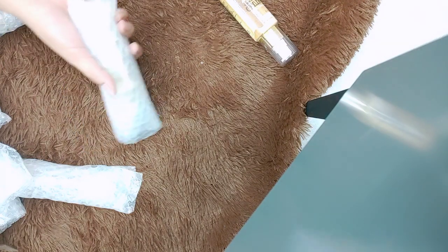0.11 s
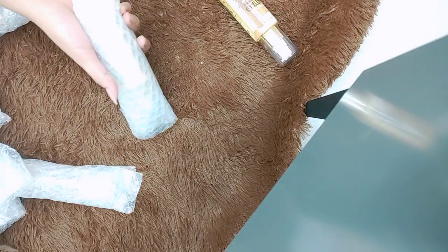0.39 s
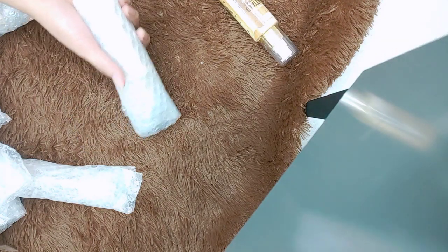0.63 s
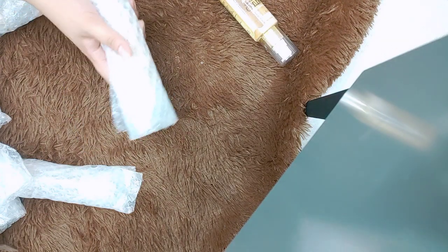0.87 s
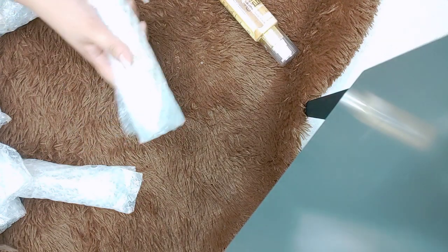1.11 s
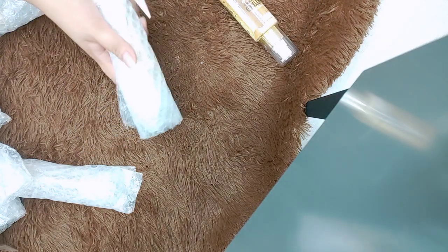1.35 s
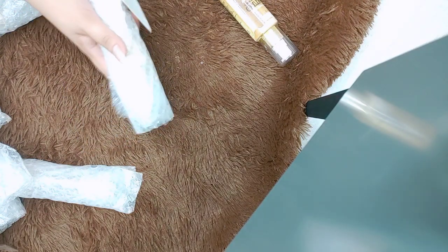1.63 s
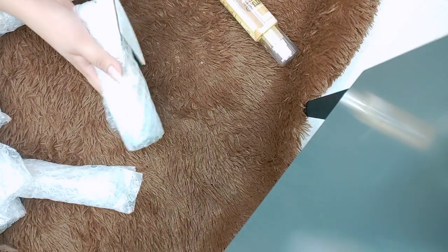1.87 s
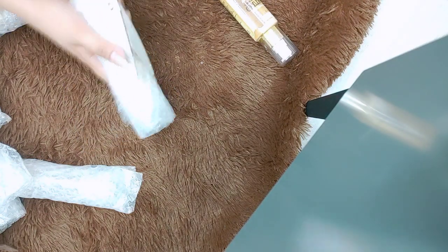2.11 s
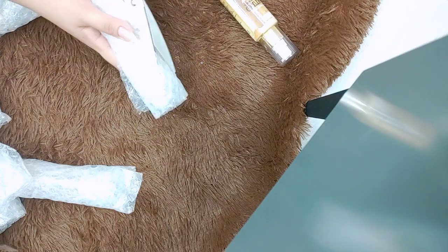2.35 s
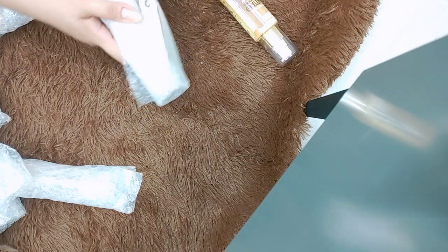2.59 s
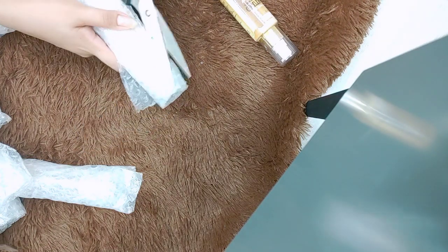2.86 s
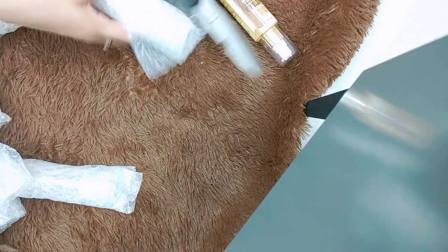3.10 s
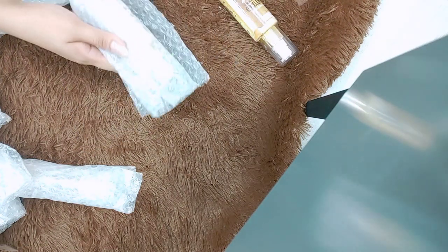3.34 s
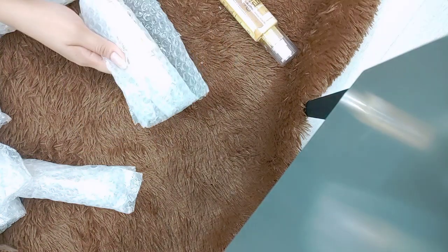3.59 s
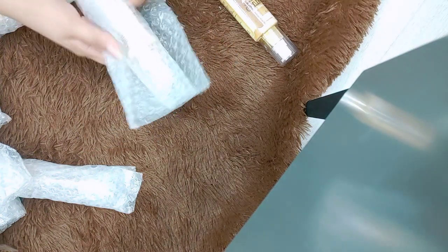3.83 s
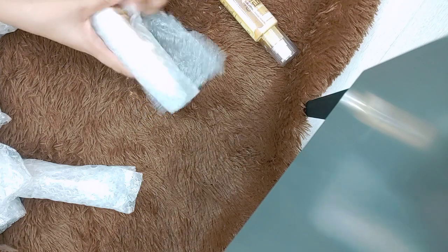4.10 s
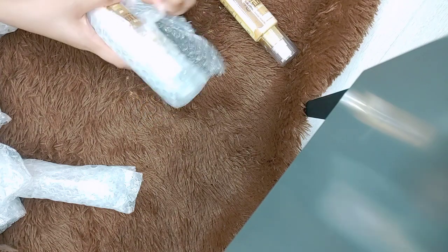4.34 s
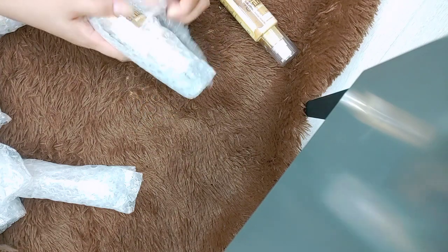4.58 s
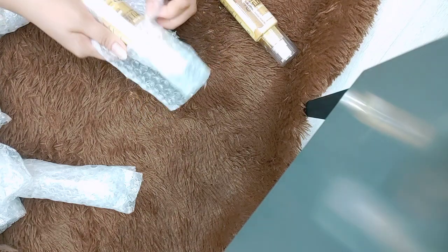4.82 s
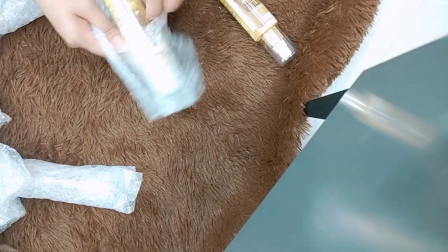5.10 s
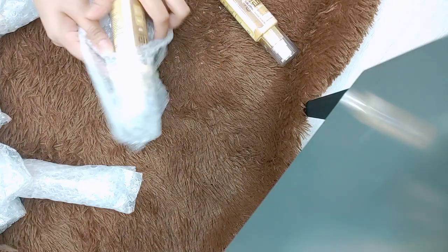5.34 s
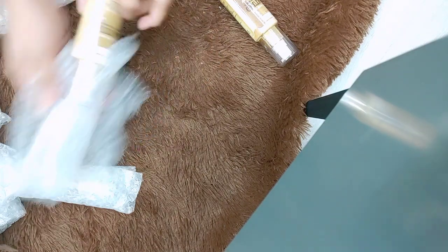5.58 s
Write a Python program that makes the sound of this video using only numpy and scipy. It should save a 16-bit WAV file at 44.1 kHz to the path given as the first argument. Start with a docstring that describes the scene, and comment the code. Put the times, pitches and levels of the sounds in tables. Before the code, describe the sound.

A close stereo microphone in a small, quiet room picks up hands handling a bottle in bubble wrap. The first 0.7 seconds are nearly silent: thin rustle, a few tiny ticks and two very faint taps. From 0.7 to 1.9 seconds small crisp clicks and light crinkles scatter. Around 2.0 to 2.3 the film gives way in loud, dry snaps with a soft low thump; another hard crack comes at 2.5, and a dense burst at about 2.75 to 3.1. A short lull follows, then scissors drop on the table at 3.5 with a loud, solid knock, bouncing more weakly at 3.6, to the left. After another quiet moment, crinkling resumes around 3.8, swelling brightly near 4.2 to 4.35, with a minute squeak at 4.6, a sharp snap just before 5.0 and a final rustling surge near 5.5. Low rumble and faint hiss stay underneath.

```python
"""In a small quiet room, close to a stereo microphone, hands cut the tape on a roll of bubble wrap
and pull the film off a bottle. The film crackles in swarms of tiny buckles, each a coloured click, with louder
single snaps; soft low thumps are damped swings and one squeak is a short tone with its octave.
After two faint early taps the scissors are dropped on the table and bounce; these knocks ring damped modes.
Early walls and a short noise tail answer, over a low rumble and a faint hiss of filtered noise."""
import sys
import numpy as np
from scipy import signal
from scipy.fft import rfft, irfft, next_fast_len
from scipy.io import wavfile
from scipy.ndimage import map_coordinates

SR = 44100
rng = np.random.default_rng(int(sys.argv[2]) if len(sys.argv) > 2 else 0)


def waveform_to_disk(signal):
    """Save audio, clipped to [-1, 1], as 16-bit WAV at the path in sys.argv[1]."""
    frames = np.transpose(np.atleast_2d(signal))
    scaled = np.clip(frames, -1, 1) * 32767
    samples = np.round(scaled).astype(np.int16)
    wavfile.write(sys.argv[1], SR, samples)


def invert_db(x):
    """Field ratio 10**(x/20) for x, a level in decibels (scalar or array-like)."""
    u = np.asarray(x, float) / 20
    return 10 ** u


N = 251447  # length [samples]

# Steady rustle of the film in the hands: (time [s], crackle level [dB], sheen over crackle [dB])
FILM_RUSTLE = [(0, -71, 8.5), (.15, -70, 2), (.35, -74.5, 4.5), (.55, -109, 25.5), (.64, -86, 3),
               (.72, -65.5, 8.5), (1.0, -65, 5), (1.3, -63, 7), (1.5, -59, 6.5), (1.9, -61.5, 6.5),
               (2.08, -53.5, 2), (2.45, -63.5, 1.5), (2.6, -56, 2.5), (2.8, -60.5, 3.5), (2.95, -61, 2),
               (3.12, -50, 3), (3.238, -55.5, 5), (3.35, -66.5, 5.5), (3.75, -69.5, 2), (3.85, -52, 1.5),
               (4.0, -61.5, 7), (4.5, -57, 3), (4.75, -57, 4.5), (5.1, -53.5, 3.5), (5.3, -59, -0.5),
               (5.7, -52.5, 2)]
# The film gives way at once and a swarm dies after it:
# (time [s], crackle level [dB], t60 [s], sheen over crackle [dB], body over crackle [dB])
FILM_RIPS = [(0.035, -60, .25, -5, -35), (.2, -84.5, .3, 22, 17), (1.016, -50, 0.16, 5.5, -23),
             (1.328, -75, 0.11, -8, -18), (1.387, -51.5, 0.23, 1.5, -34), (1.463, -54, 0.34, 5.5, -35),
             (1.652, -48.5, 0.61, 4, -8), (1.985, -49, 0.059, 8, -7), (2.028, -35.5, 0.04, -2, -23),
             (2.126, -32.5, 0.18, 0.5, -11), (2.498, -38, 0.24, -4.5, -6.5), (2.744, -49, 0.061, -2, -24),
             (2.822, -42.5, 0.13, -0.5, -10.5), (2.858, -40, 0.1, -4, -12), (2.974, -49, 0.56, 2, -16),
             (3.018, -29.5, 0.14, -10, -10.5), (3.058, -47.5, 0.12, 10.5, 8), (3.824, -54, .6, 9.5, -0.5),
             (4.141, -44, 0.33, 1.5, -13.5)]
# A tug on the film swells and slackens:
# (peak time [s], crackle level [dB], rise per 20 dB [s], fall per 20 dB [s], sheen over crackle [dB])
FILM_TUGS = [(0.713, -57.5, 0.053, 0.067, 5), (.87, -62.5, 0.12, .1, -4), (2.273, -38.5, 0.04, 0.039, -2.5),
             (2.47, -55.5, 0.034, 0.041, 5.5), (4.049, -54, 0.05, 0.073, 4), (4.21, -48.5, 0.12, 0.097, 4),
             (4.333, -39, 0.041, 0.06, 2.5), (4.563, -44.5, 0.028, 0.045, 0.5), (4.6, -59, 0.054, 0.043, 8),
             (4.705, -53, 0.054, 0.031, 1), (4.8, -55, 0.056, 0.3, 5.5), (4.962, -42, 0.063, 0.035, 5.5),
             (5.145, -63.5, 0.055, 0.04, 16.5), (5.25, -54, 0.041, 0.028, 5.5),
             (5.36, -50, 0.045, 0.035, 5), (5.45, -51, .03, 0.032, 6), (5.534, -41.5, 0.06, 0.054, 1)]
# Single loud buckles: (time [s], level [dB], sheen over it [dB], body over it [dB])
LOUD_BUCKLES = [(.0328, -42.5, 3, -34), (0.1135, -43.5, -9, -30), (0.702, -42, -3, -25),
                (0.7182, -40.5, 8, -29), (0.8783, -47, -8, -12), (1.0166, -46.5, 17, -35),
                (1.0732, -37.5, 1, -15), (1.1557, -43, -8, -32), (1.2514, -43, -3, -3),
                (1.3285, -37.5, -4, -12), (1.3816, -59, 12, -20), (1.3893, -46.5, 13, -30),
                (1.4053, -48, -2, -28), (1.4622, -43, 10, -30), (1.5102, -34, -6, -12),
                (1.553, -51, 0, -18), (1.5937, -33, -5, -13), (1.6563, -35, 10, -1), (1.983, -30.5, -1, -6),
                (2.0275, -23, -0.5, -17), (2.097, -39, 12, -23), (2.1283, -18, -12, -23),
                (2.1494, -15, -10, -5), (2.2482, -27.5, 3.5, 2.5), (2.262, -29, 2, -7),
                (2.2729, -24.5, -12.5, -1), (2.2876, -25, -8, -2), (2.501, -16.5, -18, -33),
                (2.507, -17, -23, -31), (2.742, -38, 0, -15), (2.8253, -25, 0.5, -24),
                (2.8575, -31, 1, -10), (2.9772, -28.5, 3.5, -29), (3.0017, -23, -4, -12),
                (3.016, -18.5, -3, -22), (3.0215, -19, 6.5, -26), (3.0613, -28, -1, 5.5),
                (3.3342, -58.5, 21, -20.5), (3.8287, -46, 6, -12), (4.1465, -32, -6, -20),
                (4.2013, -25, 8.5, -25), (4.213, -29, -2, -44), (4.2229, -24.5, -4, -34),
                (4.2497, -35.5, 11.5, -23), (4.4597, -39.5, 12, -25), (4.531, -54, -13, -18),
                (4.5661, -31, -2, -17), (4.6995, -43, 3, -12), (4.7236, -49, 0, -10),
                (4.9054, -38.5, -9, -14), (4.9789, -22.5, -1, -31), (5.081, -56, 10, -15),
                (5.1417, -42, 0, -22), (5.15, -49, 8, -5), (5.1575, -47, 15, -12), (5.225, -52.5, 8, 12),
                (5.242, -39.5, -1, 0), (5.2559, -56, 9, -17), (5.3102, -37, -7, -20),
                (5.4479, -37.5, 6, 1.5), (5.46, -42, 8, -19)]
# Spectra of a buckle, low, middle and high: (frequency [Hz], level [dB])
BODY_SPECTRUM = [(60, -28), (140, -16), (210, -6), (300, -4.5), (450, 3.5), (750, 1), (1100, -3.5),
                 (2000, -71.5)]
CRACKLE_SPECTRUM = [(300, -44), (650, -14), (1000, -4), (1600, -2), (2500, -0.5), (3200, -2), (3900, -9),
                    (5000, -10.5), (8000, -51)]
SHEEN_SPECTRUM = [(3000, -31.5), (4200, -11.5), (5200, -8), (6500, 0), (7600, -1.5), (9000, -10),
                  (11000, -18.5), (14000, -19.5), (15800, -20), (16300, -48)]
# Where the hands hold the roll: (time [s], left-right level [dB])
ROLL_PLACE = [(0, 3.5), (1.9, 3.5), (2.15, 5.5), (3.05, 5), (3.3, 2.5), (4.3, 3), (5.7, 2.5)]
# Soft low thumps under the film's rips, and the ring of a faint tap:
# (time [s], frequency [Hz], level [dB], t60 [s])
LOW_THUMPS = [(0.203, 200, -59, 0.07), (0.576, 421, -72, .3), (1.505, 200, -57, 0.037),
              (1.655, 192, -55, 0.057), (2.131, 210, -44.5, 0.23), (2.1485, 468, -25, 0.04),
              (2.27, 220, -54, 0.12), (2.501, 216, -46.5, 0.13), (2.8627, 347, -37, 0.075),
              (3.022, 200, -60, 0.083), (3.0595, 706, -40, 0.012), (3.064, 332, -36.5, 0.073)]
# Film slipping on film: (time [s], length [s], frequency [Hz], level [dB], octave over it [dB])
FILM_SQUEAK = (4.592, .015, 2700, -37, -8)
# Knocks on the table, two faint early taps, then the scissors and their bounces:
# (time [s], drive level [dB], upper modes' extra drive [dB], left-right level [dB])
TABLE_KNOCKS = [(0.2002, -62, 16, 3), (0.574, -70.5, 13.5, 4), (3.4882, -16.5, -0.7, 8),
                (3.5876, -34, -0.5, 6.5), (3.6012, -29, -17, 8.5)]
# Damped modes that the knocks ring: (frequency [Hz], bandwidth [Hz], level [dB])
TABLE_MODES = [(200, 45, -2), (428.6, 3, 7.5), (525, 185, -0.5), (1196, 90, -4), (1685, 185, -2.5),
               (2980, 100, 1), (6200, 1240, -5.5)]
# Early reflections: (delay [s], left level [dB], right level [dB])
WALL_ECHOES = [(.0075, -20, -20), (.013, -12, -13), (.0165, -19, -19), (.024, -11, -12), (.036, -18, -18),
               (.047, -20, -20)]
# Decay of the room tail: (frequency [Hz], t60 [s])
TAIL_DECAY = [(100, 0.83), (500, 0.32), (2000, 0.29), (6500, 0.31), (14000, 0.26)]
# Low rumble before waver and left-right offset: (time [s], level [dB])
RUMBLE_LEVEL = [(0.0, -89), (0.67, -95), (0.71, -66.5), (1.16, -84), (1.19, -69), (1.49, -85),
                (1.67, -60.5), (1.81, -85), (2.3, -72), (2.4, -83), (2.78, -74), (2.97, -79), (3.03, -72),
                (3.14, -81), (3.32, -72), (3.45, -80), (3.49, -54), (4.14, -78), (4.92, -71), (5.06, -88),
                (5.21, -68.5), (5.7, -67.5)]
# Spectra of rumble and hiss: (frequency [Hz], relative level [dB])
RUMBLE_SPECTRUM = [(20, -28.5), (40, -9), (65, -12), (87, -1), (108, -12.5), (140, -7), (200, -72),
                   (400, -49)]
HISS_SPECTRUM = [(88, -45), (150, 3), (162, -24), (348, 3), (700, -20), (1500, -10), (2310, 10), (3770, -1),
                 (7040, 7), (10200, -12), (16000, -30.5)]
# Colour difference of the two microphone ports: (frequency [Hz], left-right level [dB])
PORT_DIFFERENCE = [(300, 1), (2000, -0.5), (6000, 2.5), (9000, -4), (14000, -3.5)]

LEFT_LAG = 4  # samples by which the left port hears later


def unit(x):
    """Normalisation: the signal is scaled to rms 1."""
    return x / np.sqrt(np.mean(x ** 2) + 1e-20)


def along(points, hz):
    """Interpolation of (frequency, value) points on a logarithmic frequency axis."""
    f, v = np.transpose(points)
    return np.interp(np.log(hz + 1), np.log(f + 1), v)


def filtered(x, response):
    """Linear filtering: the spectrum is multiplied by a response of frequency."""
    size = next_fast_len(N + 8192)
    hz = np.fft.rfftfreq(size, 1 / SR)
    return irfft(rfft(x, size) * response(hz), size)[..., :N]


def coloured(x, points):
    """Minimum phase: the folded cepstrum of a spectrum gives a causal pulse, here of energy 1."""
    size = 2048
    log_spectrum = np.log(invert_db(along(points, np.fft.rfftfreq(size, 1 / SR))))
    cepstrum = irfft(log_spectrum)
    cepstrum[1:size // 2] *= 2
    cepstrum[size // 2 + 1:] = 0
    pulse = irfft(np.exp(rfft(cepstrum)))
    pulse = pulse / np.linalg.norm(pulse)
    return signal.oaconvolve(x, pulse[None], axes=1)[:, :N]


def impulses(s, size, pan_db, lag):
    """Localisation by level and delay: the left port hears each impulse lag samples late."""
    right_at = np.round(s * SR).astype(int)
    left_at = right_at + np.round(lag).astype(int)
    ports = [(left_at, invert_db(pan_db / 2)), (right_at, invert_db(-pan_db / 2))]
    return np.array([np.bincount(np.clip(at, 0, N - 1), size * gain, N) for at, gain in ports])


def handling(s):
    """Power addition: rustle, rips and tugs set the crackle, sheen and body levels at times s."""
    t, db, sheen_db = np.transpose(FILM_RUSTLE)
    db = np.interp(s, t, db)
    body_db = 0 * s - 12
    power = invert_db(db + np.array([0 * s, np.interp(s, t, sheen_db), body_db])) ** 2
    for at, db, t60, sheen_db, body_db in FILM_RIPS:
        colours_db = np.array([[0], [sheen_db], [body_db]])
        power += (s >= at) * invert_db(db - 60 * np.abs(s - at) / t60 + colours_db) ** 2
    for at, db, rise, fall, sheen_db in FILM_TUGS:
        colours_db = np.array([[0], [sheen_db], [-14.5]])
        slope_db = 20 * np.clip([(at - s) / rise, (s - at) / fall], -9, 9)
        power += (2 * invert_db(db + colours_db) / invert_db(slope_db).sum(0)) ** 2
    db, sheen_db, body_db = 10 * np.log10(power)
    return db, sheen_db - db, body_db - db


def buckles(s, db, sheen_db, body_db, pan_db, chance, colour_db, spread):
    """Impulsive radiation: each buckle is a click of three colours with chance signs, levels and lag."""
    lag = LEFT_LAG + spread * chance[:, 0]
    parts = [(CRACKLE_SPECTRUM, 0), (SHEEN_SPECTRUM, sheen_db), (BODY_SPECTRUM, body_db)]
    out = np.zeros((2, N))
    for k, (spectrum, relative_db) in enumerate(parts):
        size = invert_db(db + relative_db + colour_db * chance[:, 1 + k])
        sign = np.sign(chance[:, 4 + k])
        out += coloured(impulses(s, sign * size, pan_db, lag), spectrum)
    return out


def crackle(per_second, tail_db, clump_db, level_db, dull_db):
    """Crackling noise: random buckles, long-tailed in size and clumped in time, follow the handling."""
    count = 40000
    s = rng.random(count) * N / SR
    live = rng.random(count) < per_second * N / SR / count
    size_db = tail_db * rng.exponential(size=count)
    clumps = map_coordinates(rng.standard_normal(600), [s * 90])  # 90 random values a second
    size_db = np.minimum(size_db, 15) + clump_db * clumps
    # the whole swarm has mean power 1 before handling; buckles that are not live are muted
    size_db -= 10 * np.log10(np.sum(live * invert_db(size_db) ** 2) / N) + 200 * ~live
    db, sheen_db, body_db = handling(s)
    chance = rng.standard_normal((count, 8))
    pan_db = np.interp(s, *np.transpose(ROLL_PLACE)) + 0.46 * chance[:, 7]
    return buckles(s, db + size_db + level_db, sheen_db - dull_db, body_db, pan_db, chance,
                   colour_db=0.0, spread=2.5)


def snaps(length):
    """Stepwise release: each loud buckle lets go in steps that fade 6 dB per length [s]."""
    count = 6  # steps
    draw = rng.standard_normal((len(LOUD_BUCKLES), 2 + count, 7))
    late = np.cumsum(np.abs(draw[:, :count, 0]), 1) - np.abs(draw[:, :1, 0])
    step_db = -6 * late
    step_db -= 10 * np.log10(np.sum(invert_db(step_db) ** 2, 1, keepdims=True))
    s, db, sheen_db, body_db = np.repeat(np.transpose(LOUD_BUCKLES), count, 1)
    pan_db = 3.5 * np.repeat(draw[:, 0, 1], count)
    chance = draw[:, 1:1 + count].copy()
    chance[:, :, 0] = draw[:, -1:, 0]  # the steps share one place on the film
    chance[:, :, 6] = draw[:, -1:, 6]  # and push its body the same way
    click_gain_db = 6.5  # from the table level to the energy of the click
    return buckles(s + length * late.ravel(), db + step_db.ravel() + click_gain_db, sheen_db, body_db,
                   pan_db, chance.reshape(-1, 7), colour_db=1.5, spread=1.5)


def thumps():
    """Damped oscillation: soft low swings with a rounded start, under the film's rips and after a faint tap."""
    out, t = np.zeros(N + SR), np.arange(SR // 10) / SR
    for s, hz, db, t60 in LOW_THUMPS:
        envelope = invert_db(db - 60 * t / t60) * (1 - np.exp(-t / 0.00087))
        out[round(s * SR):][:len(t)] += envelope * np.sin(2 * np.pi * hz * t)
    return np.array([np.roll(out, LEFT_LAG)[:N] * invert_db(-4.5), out[:N] * invert_db(-5.0)])


def squeak():
    """Frictional slip: film on film gives a brief, slightly unsteady tone and its octave."""
    s, length, hz, db, octave_db = FILM_SQUEAK
    t = np.arange(N) / SR
    swell = np.sin(np.pi * np.clip((t - s) / length, 0, 1)) ** 2.2
    phase = 2 * np.pi * hz * t + .11 * np.cumsum(rng.standard_normal(N))
    tone = np.sin(phase) + invert_db(octave_db) * np.sin(2 * phase)
    return invert_db(db + np.array([[2], [-2]])) * swell * tone


def knocks():
    """Modal excitation: a blunt contact, poor in treble and bass, rings damped modes; a hard one the upper."""
    s, db, hard_db, pan_db = np.transpose(TABLE_KNOCKS)

    def resonance(f, centre, width):
        return 1j * f * width / (centre ** 2 - f * f + 1j * f * width)

    out = np.zeros((2, N))
    for upper in (False, True):
        modes = [(k, mode) for k, mode in enumerate(TABLE_MODES) if (mode[0] > 800) == upper]

        def response(f):
            ringing = sum((-1) ** k * invert_db(g) * resonance(f, c, w) for k, (c, w, g) in modes)
            return ringing * resonance(f, 620, 500)  # the contact is a broad band around 620 Hz

        out += filtered(impulses(s, invert_db(db + upper * hard_db + 39.0), pan_db, LEFT_LAG), response)
    return out


def room(x, walls_db, tail_db):
    """Reflection and reverberation: early walls, then five tails in turn, as the source moves."""
    walls = np.zeros((2, SR // 20))
    for s, *db in WALL_ECHOES:
        walls[[0, 1], round(s * SR) + rng.integers(-9, 9, 2)] = invert_db(np.array(db))
    out = x + invert_db(walls_db) * signal.oaconvolve(x, walls, axes=1)[:, :N]
    turn = np.arange(N) // (SR // 10) % 5  # the next tail every tenth of a second
    for k in range(5):
        noise = rng.standard_normal((2, SR // 2)) + 0.24 * rng.standard_normal(SR // 2)
        hz, t, z = signal.stft(noise, SR, nperseg=256)
        decay = invert_db(-60 * t / along(TAIL_DECAY, hz)[:, None])
        tail = signal.istft(z * decay, SR, nperseg=256)[1]
        tail = np.pad(tail, ((0, 0), (150, 0))) / np.linalg.norm(tail[0])  # starts 150 samples late
        out += invert_db(tail_db) * signal.fftconvolve(x * (turn == k), tail, axes=1)[:, :N]
    return out


def background():
    """Filtered noise: a nearly mono rumble that wavers, stronger on the left, and a faint hiss."""
    t, db = np.transpose(RUMBLE_LEVEL)
    time = np.arange(N) / SR
    noise = rng.standard_normal(N) + 0.28 * rng.standard_normal((2, N))
    rumble = unit(filtered(noise, lambda hz: invert_db(along(RUMBLE_SPECTRUM, hz))))
    hiss = unit(filtered(rng.standard_normal((2, N)), lambda hz: invert_db(along(HISS_SPECTRUM, hz))))
    waver_db = 1.5 * map_coordinates(rng.standard_normal(60), [time * 10])  # 10 random values a second
    rumble_db = np.interp(time, t, db) + waver_db + [[2.5], [-3.5]]
    return rumble * invert_db(rumble_db) + invert_db(-79) * hiss


def scene():
    """Superposition: film sounds get slightly weaker early walls than the knocks on the table."""
    film = crackle(per_second=4000, tail_db=0.5, clump_db=1.5, level_db=-1.35, dull_db=-0.3)
    film = film + snaps(length=0.00067)
    # a sparse, duller swarm with a wider range of sizes
    film = film + crackle(per_second=120, tail_db=2, clump_db=1.2, level_db=-7.5, dull_db=4)
    near = room(film + thumps() + squeak(), walls_db=-4, tail_db=-6)
    table = room(knocks(), walls_db=-1, tail_db=-8)
    return near + table + background()


def band_limit(x):
    """A steep low-pass at the top of the band."""
    return signal.sosfilt(signal.butter(12, 16700, fs=SR, output="sos"), x)


def record(dry):
    """Microphone response: the ports' level difference over frequency is split evenly between them."""
    sides = np.array([[1], [-1]])
    mix = filtered(dry, lambda hz: invert_db(along(PORT_DIFFERENCE, hz) / 2 * sides))
    return band_limit(mix)


dry = scene()
out = record(dry)
waveform_to_disk(out)
```